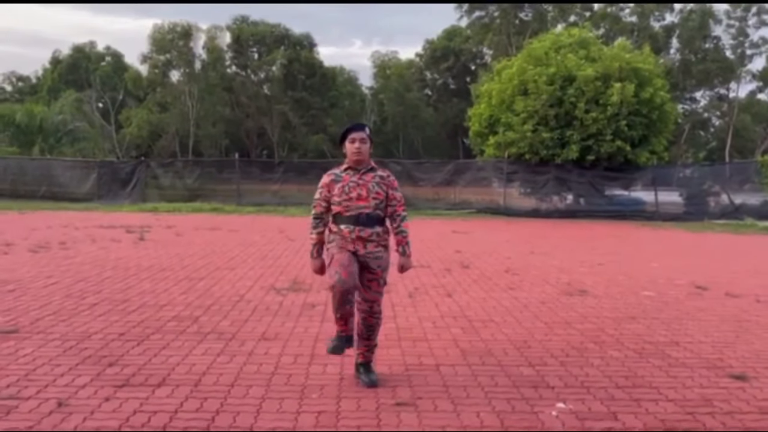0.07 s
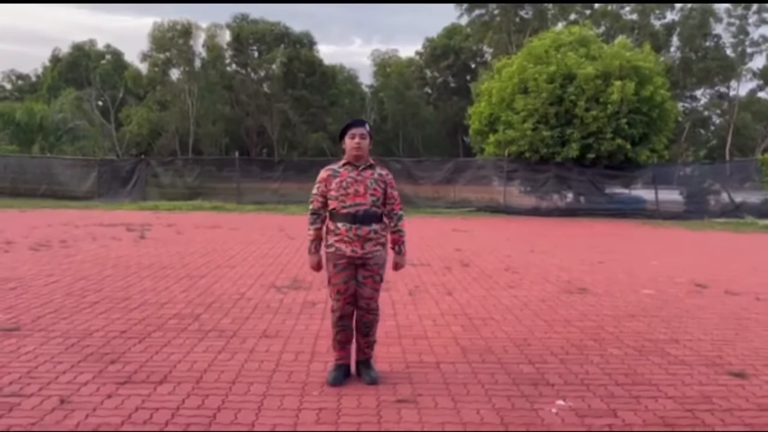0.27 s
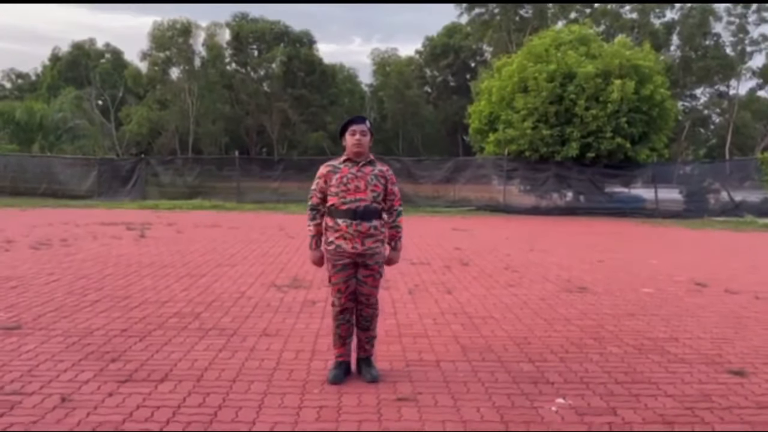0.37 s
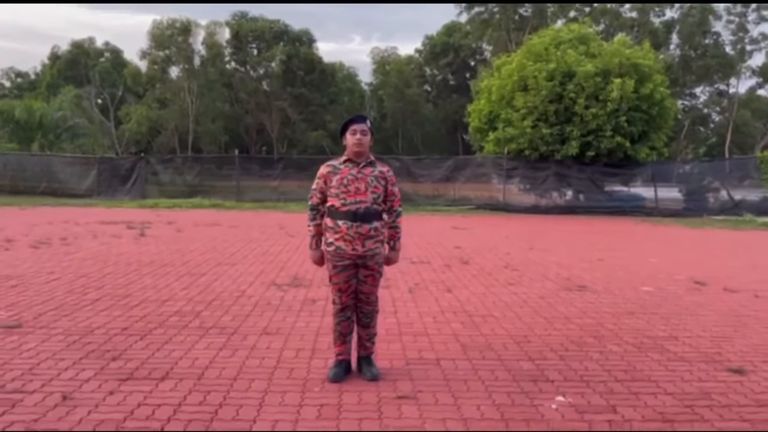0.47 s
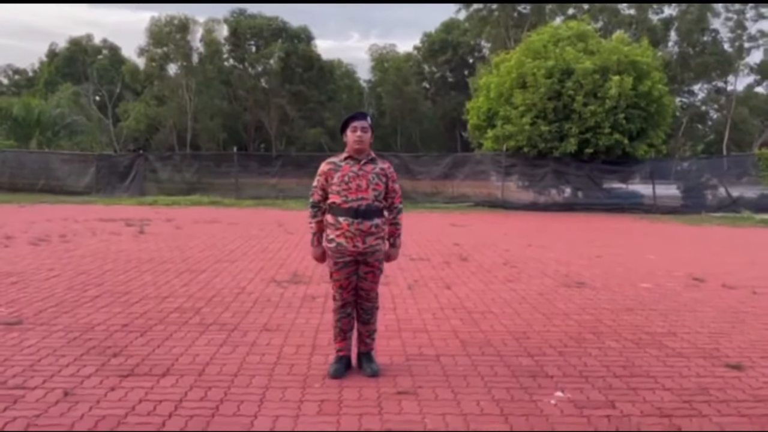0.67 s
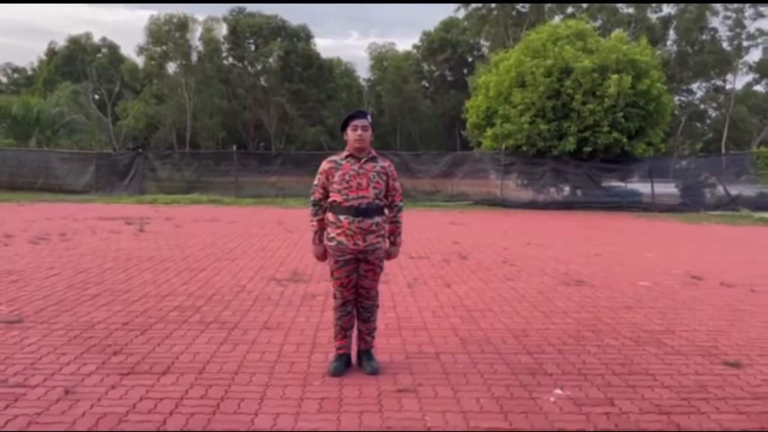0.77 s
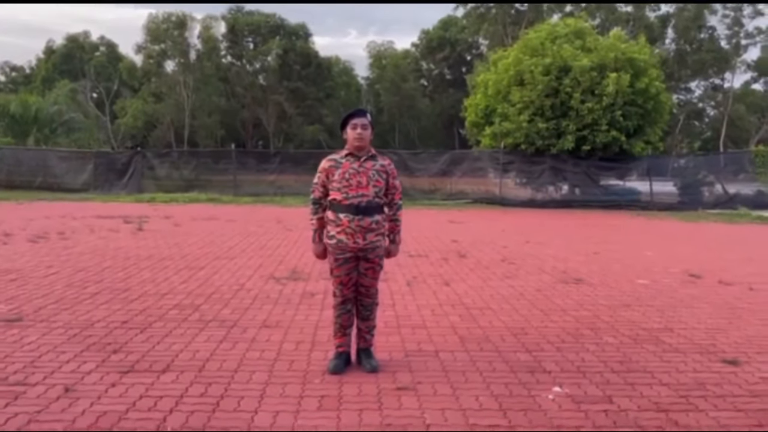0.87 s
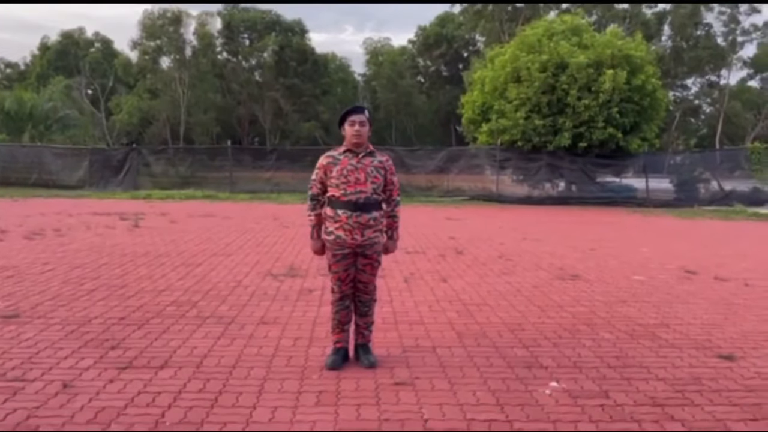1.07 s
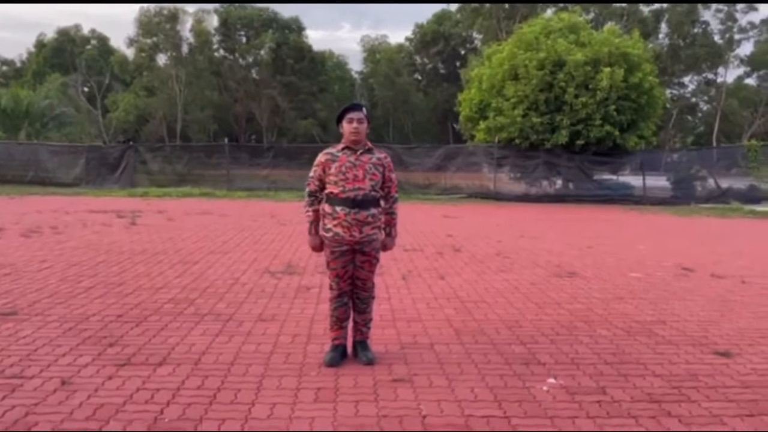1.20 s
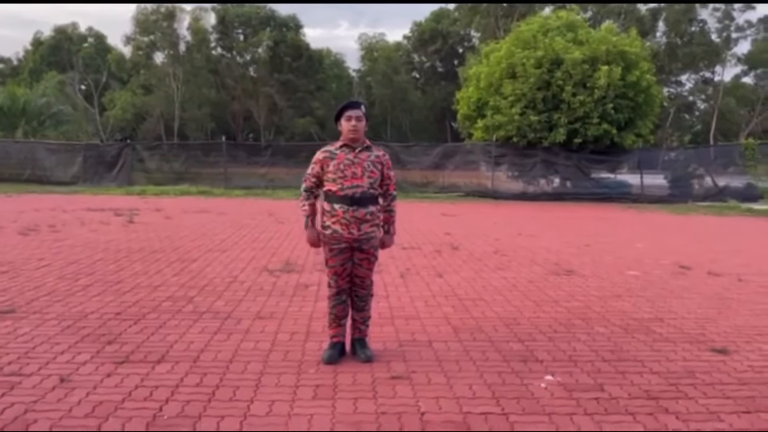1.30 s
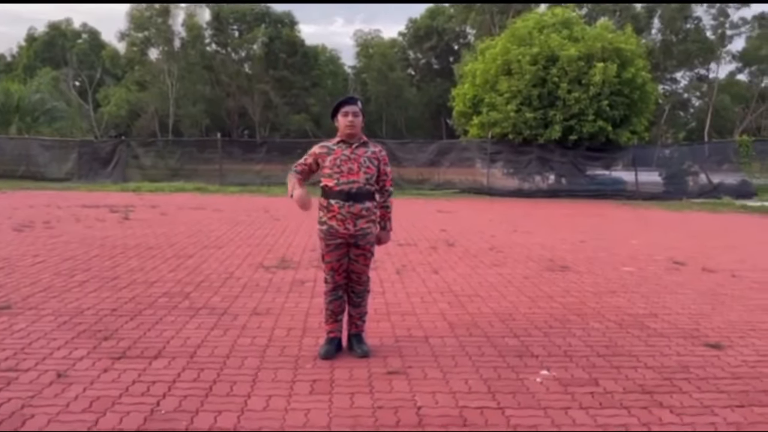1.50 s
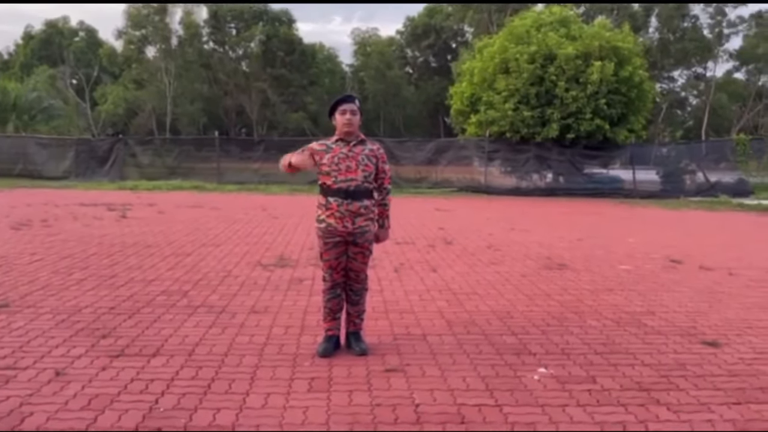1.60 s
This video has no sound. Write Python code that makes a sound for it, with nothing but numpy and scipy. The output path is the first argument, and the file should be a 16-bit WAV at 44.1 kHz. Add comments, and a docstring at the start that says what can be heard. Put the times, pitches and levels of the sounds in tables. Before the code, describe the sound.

A single boot stamps on brick paving, a sharp slap and short thump with a little grit and a faint echo. Then clothing rustles softly and small birds peep and whistle over distant traffic in an open yard.

```python
"""An open yard: distant traffic, an engine hum and a thin insect buzz run throughout.
A small bird starts peeping in the trees. At 0.2 s one boot stamps on the brick paving:
a slap of the sole, a short low thump, then the foot settles on grit. Yard and trees answer faintly.
From 0.6 s the uniform rustles and a second bird gives four rising whistles."""
import sys
import numpy as np
from scipy import signal
from scipy.fft import rfft, irfft, next_fast_len
from scipy.io import wavfile
from scipy.ndimage import map_coordinates

SR = 44100
rng = np.random.default_rng(int(sys.argv[2]) if len(sys.argv) > 2 else 0)


def wav_record(signal):
    """Record a signal, one row per channel, as 16-bit PCM in the file named by sys.argv[1]."""
    frames = np.transpose(np.atleast_2d(signal))
    bounded = np.clip(frames, -1, 1)
    # unit amplitude maps onto the largest positive 16-bit level
    quanta = np.round(bounded * 32767).astype(np.int16)
    wavfile.write(sys.argv[1], SR, quanta)


N = 72765


def amp(db):
    """Decibels to gain."""
    return 10 ** (np.asarray(db) / 20)


def unit(x):
    """Scale to rms 1."""
    return x / np.sqrt(np.mean(x ** 2) + 1e-20)


def since(start_s):
    """Seconds since start_s per sample, zero before it."""
    return np.maximum(np.arange(N) / SR - start_s, 0)


def wobble(rate_hz):
    """Smooth random curve, rate_hz knots a second."""
    knots = rng.standard_normal(int(N * rate_hz / SR) + 4)
    return map_coordinates(knots, [np.arange(N) * rate_hz / SR])


def filtered(x, response):
    """Apply a gain given as a function of Hz."""
    size = next_fast_len(N + 8192)
    return irfft(rfft(x, size) * response(np.fft.rfftfreq(size, 1 / SR)), size)[:N]


def noise(spectrum, grain_db=0):
    """Noise of rms 1 shaped by (freq_hz, gain_db) rows; grain_db clumps it into grains."""
    freq_hz, gain_db = np.transpose(spectrum)
    grains = rng.standard_normal(N) * amp(grain_db * wobble(900))
    return unit(filtered(grains, lambda hz: amp(np.interp(np.log(hz + 1), np.log(freq_hz), gain_db))))


def bursts(rows):
    """Summed envelopes of (start_s, level_db, rise_s, t60_s) rows."""
    envelope = np.zeros(N)
    for start_s, level_db, rise_s, t60_s in rows:
        t = since(start_s)
        envelope += np.minimum(t / rise_s, 1) * amp(level_db - 60 * np.maximum(t - rise_s, 0) / t60_s)
    return envelope


def tone(pitch_hz):
    """Sine of rms 1 on a pitch curve."""
    return np.sqrt(2) * np.sin(2 * np.pi * (np.cumsum(pitch_hz) / SR + rng.random()))


def echo(x, spectrum, t60_s, delay_s):
    """Convolve with a diffuse outdoor tail of energy 1."""
    tail = noise(spectrum) * bursts([(delay_s, 0, 0.005, t60_s)])
    return signal.fftconvolve(x, tail / np.linalg.norm(tail))[:N]


# freq_hz, gain_db
TRAFFIC_SPECTRUM = [(20, -25), (37, -6), (55, -2), (81, -2), (112, -7.5), (176, -10.5), (215, -11.5),
                    (270, -18), (355, -20.5), (600, -29), (894, -27.5), (1370, -33.5), (1700, -36),
                    (2690, -44), (3200, -39.5), (3650, -50.5), (5500, -56), (7900, -59.5), (8600, -70.5),
                    (12000, -73.5), (15800, -73)]

def traffic(level_db=-49):
    """Far traffic and leaves merge into a low, nearly steady rush."""
    return amp(level_db + 0.47 * wobble(7.54)) * noise(TRAFFIC_SPECTRUM)


# time_s, level_db
HUM_LEVELS = [(0, -62.5), (0.6, -61), (0.85, -51), (1.2, -53.5), (1.35, -58), (1.6, -53)]
# pitch_hz, level_db
ENGINE_DRONES = [(53.5, -57), (79, -56.5), (141, -63)]

def engine(hum_hz=176.5):
    """An engine's hum swells and dips over lower, wavering tones."""
    hum_db = np.interp(since(0), *np.transpose(HUM_LEVELS)) + 0.76 * wobble(6.78)
    hum = amp(hum_db) * tone(hum_hz + 0.58 * wobble(8.17))
    drones = sum(amp(db + 2.7 * wobble(8.6)) * tone(hz + 2 * wobble(14)) for hz, db in ENGINE_DRONES)
    return hum + drones


def insect(centre_hz=3178, width_hz=150, level_db=-78.5):
    """Thin buzz: a narrow noise band with a fast flutter."""
    band = filtered(rng.standard_normal(N), lambda hz: np.exp(-0.5 * ((hz - centre_hz) / width_hz) ** 2))
    return amp(level_db + 2.9 * wobble(90)) * unit(band)


# start_s
PEEP_STARTS = [0.07, 0.285, 0.504, 0.549, 0.77, 0.935, 0.995, 1.161, 1.376, 1.429]

def peeping_bird(pitch_hz=7750, fall_hz=260, length_s=0.046):
    """Faint, thin peeps, each falling slightly."""
    song = np.zeros(N)
    for start_s in PEEP_STARTS:
        progress = np.minimum(since(start_s) / length_s, 1)
        song += np.sin(np.pi * progress) * tone(pitch_hz - fall_hz * progress)
    return amp(-90) * song


def through_trees(song):
    """The trees blur birdsong: direct sound plus a scattered tail."""
    spectrum = [(4000, 0), (6500, -2), (7700, -4.5)]
    return amp(-2) * song + amp(-3) * echo(song, spectrum, t60_s=0.5, delay_s=0.0049)


# freq_hz, gain_db
SLAP_SPECTRUM = [(300, -11), (1500, 1.5), (3000, -0.5), (4300, -5), (4900, -16), (5500, -6.5), (6600, -6),
                 (8000, -24), (11000, -36), (13000, -46), (16000, -46)]

def sole_slap(start_s, level_db=-33, rise_s=0.00044, t60_s=0.018):
    """The sole's first contact cracks against the brick."""
    return noise(SLAP_SPECTRUM) * bursts([(start_s, level_db, rise_s, t60_s)])


# after_s, contact_db, thump_db
BOOT_CONTACTS = [(0, 0, 0), (0.0275, -21, -2.5)]
# delay_s, pitch_hz, peak_db, rise_s, t60_s; first row is the thump
BOOT_MODES = [(0.0016, 225, -14, 0.0051, 0.027), (0, 890, -13, 0.0038, 0.0042),
              (0.00081, 660, -17, 0.00084, 0.017), (0.0002, 1855, -21, 0.00057, 0.013),
              (0.0001, 2730, -32.5, 0.00063, 0.021), (0.003, 317, -31, 0.0024, 0.04)]

def boot_ring(start_s):
    """Each contact swells smoothly in the boot's modes and dies quickly."""
    ring = np.zeros(N)
    for after_s, contact_db, thump_db in BOOT_CONTACTS:
        for mode, (delay_s, pitch_hz, peak_db, rise_s, t60_s) in enumerate(BOOT_MODES):
            t = since(start_s + after_s + delay_s)
            gain = amp(contact_db + peak_db + thump_db * (mode == 0))
            swell = np.sin(np.pi / 2 * np.minimum(t / rise_s, 1)) ** 2
            decay = amp(-60 * np.maximum(t - rise_s, 0) / t60_s)
            ring += gain * swell * decay * np.sin(2 * np.pi * pitch_hz * t)
    return ring


# freq_hz, gain_db
SNAP_SPECTRUM = [(2000, -6), (6500, 3), (11000, -8), (13000, -23), (16000, -20)]

def sand_snap(start_s=0.1966, level_db=-50, rise_s=0.0001, t60_s=0.002):
    """One grain of sand snaps under the full weight."""
    return noise(SNAP_SPECTRUM) * bursts([(start_s, level_db, rise_s, t60_s)])


# freq_hz, gain_db
GRIT_SPECTRUM = [(100, -6.5), (250, -0.5), (480, 1.5), (800, 2), (1100, 1.5), (1450, -7.5), (1900, -5.5),
                 (2500, -9.5), (3300, -19.5), (4300, -15), (4900, -37), (6400, -20), (7500, -39),
                 (8500, -56), (16000, -64)]
# start_s, level_db, rise_s, t60_s
GRIT_SCUFFS = [(0.2045, -38, 0.00068, 0.056), (0.217, -42, 0.0019, 0.16), (0.238, -48.5, 0.0022, 0.056)]

def grit():
    """Sand crunches under the settling sole."""
    return noise(GRIT_SPECTRUM, grain_db=2.5) * bursts(GRIT_SCUFFS)


# freq_hz, gain_db
ECHO_SPECTRUM = [(100, -14), (250, -5.5), (800, -5.5), (3000, -5), (6000, -6), (9000, -6.5)]

def yard_answer(stomp):
    """A short echo from the yard, then a fainter, longer one from the trees."""
    yard = amp(-23) * echo(stomp, ECHO_SPECTRUM, t60_s=0.17, delay_s=0.022)
    trees = amp(-30.5) * echo(stomp, ECHO_SPECTRUM, t60_s=0.74, delay_s=0.069)
    return yard + trees


# freq_hz, gain_db
CLOTH_SPECTRUM = [(500, -8), (3500, 0), (5000, 0), (8000, -8.5), (9500, -29), (16000, -54)]
# start_s, level_db, rise_s, t60_s
CLOTH_RUSTLES = [(0.608, -72, 0.013, 0.16), (0.752, -67.5, 0.016, 0.16), (1.205, -74, 0.034, 0.13),
                 (1.55, -74, 0.025, 0.17)]

def cloth():
    """The uniform rustles as it shifts."""
    return noise(CLOTH_SPECTRUM) * bursts(CLOTH_RUSTLES)


# start_s, length_s, hold_s, from_hz, to_hz, level_db
WHISTLES = [(0.658, 0.099, 0.0026, 4920, 6900, -63.5), (0.861, 0.14, 0.028, 5400, 6455, -66),
            (1.238, 0.14, 0.0031, 4980, 6000, -66.5), (1.588, 0.067, 0, 4970, 6840, -63)]

def whistling_bird(sweep_s=0.042, rough_hz=150, fade_db=-18.5):
    """Rough whistles sweep upward, level off and fade."""
    song = np.zeros(N)
    for start_s, length_s, hold_s, from_hz, to_hz, level_db in WHISTLES:
        progress = np.minimum(since(start_s) / length_s, 1)
        sweep_left = np.exp(-(since(start_s + hold_s) / sweep_s) ** 1.7)
        pitch_hz = to_hz + (from_hz - to_hz) * sweep_left + rough_hz * wobble(500)
        arch = np.sqrt(np.abs(np.sin(np.pi * progress)))
        song += amp(level_db + fade_db * progress) * arch * tone(pitch_hz)
    return song


def scene(stomp_s=0.1947):
    """Quiet surroundings, the stomp and its answer, in mono."""
    background = traffic() + engine() + insect()
    birds = through_trees(peeping_bird() + whistling_bird())
    stomp = sole_slap(stomp_s) + boot_ring(stomp_s) + sand_snap() + grit()
    return (background + birds + stomp + yard_answer(stomp) + cloth())[None]


def record(dry, fade_in_s=0.006, top_hz=15800):
    """Brief fade-in, then the microphone's band limit."""
    fade_in = np.minimum(since(0) / fade_in_s, 1)
    return np.array([filtered(x * fade_in, lambda hz: hz < top_hz) for x in dry])


dry = scene()
out = record(dry)
wav_record(out)
```